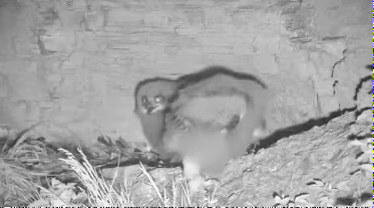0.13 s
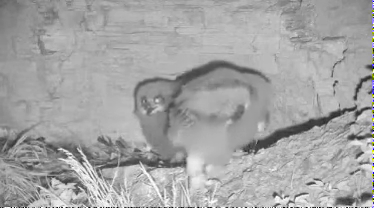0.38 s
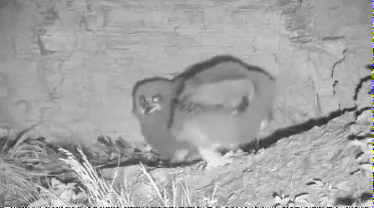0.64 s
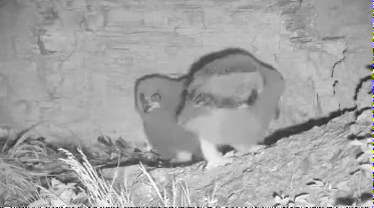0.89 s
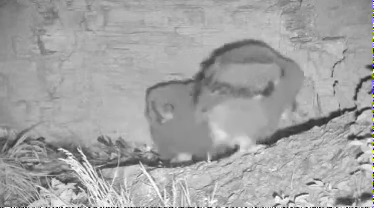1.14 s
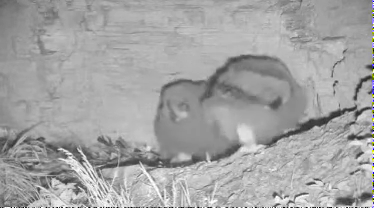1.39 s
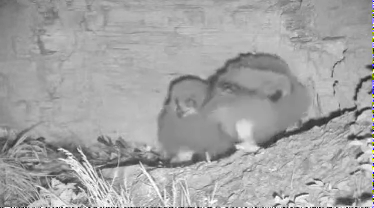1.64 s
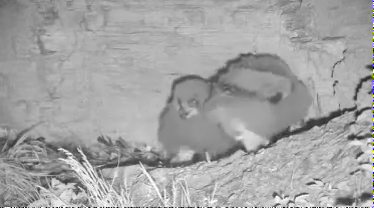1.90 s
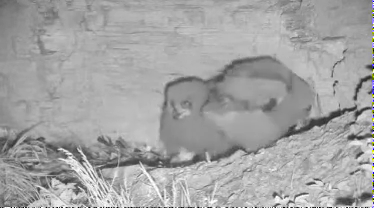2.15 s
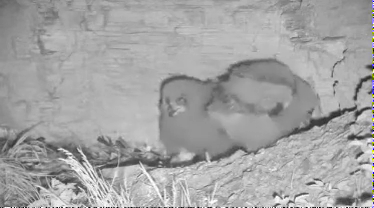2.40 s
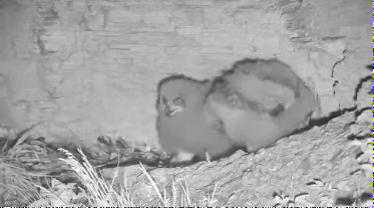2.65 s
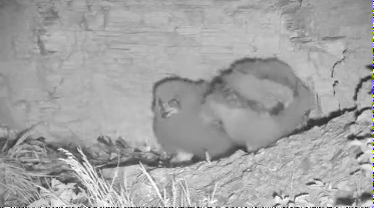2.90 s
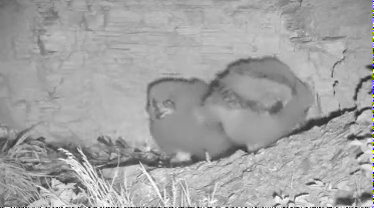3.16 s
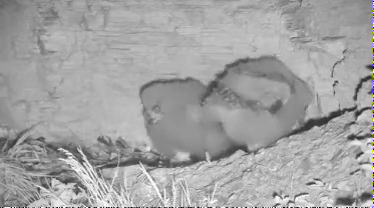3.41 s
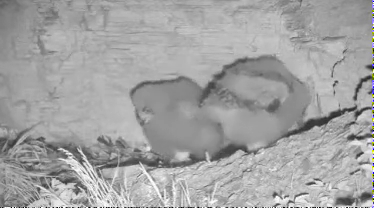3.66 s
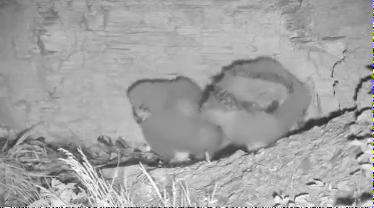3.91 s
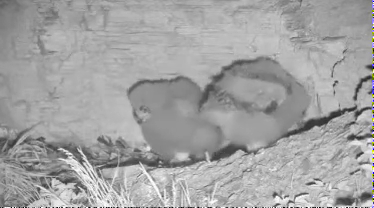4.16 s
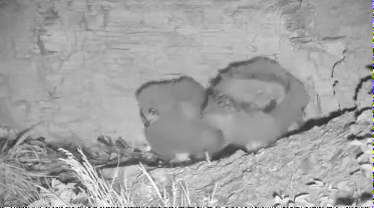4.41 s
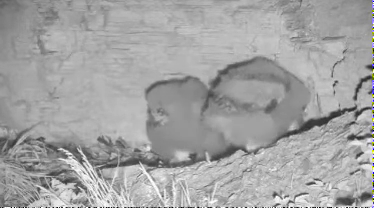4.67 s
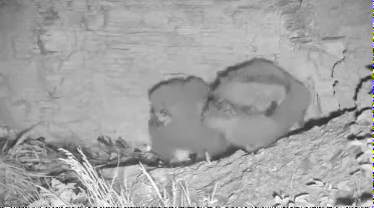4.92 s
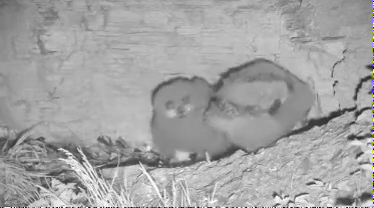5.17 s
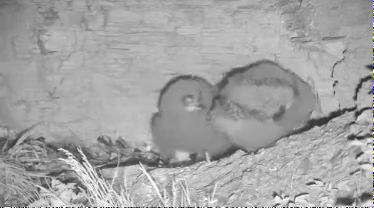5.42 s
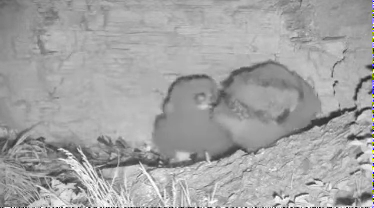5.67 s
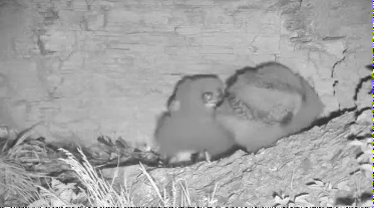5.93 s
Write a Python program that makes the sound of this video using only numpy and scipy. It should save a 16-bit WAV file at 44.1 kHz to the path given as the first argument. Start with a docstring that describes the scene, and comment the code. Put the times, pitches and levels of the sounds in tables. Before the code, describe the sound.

One small dry tick sounds, then an owl chick in a wooden nest begs twice, a couple of seconds apart. Each call starts as a hoarse, wavering, breathy whistle and runs on into a rush of hiss. The chick is close to the microphone, and the walls add only a faint tail. A faint fan whine, electrical buzz and soft hiss continue throughout.

```python
"""An owl chick begs twice, hoarsely, in a wooden nest, close to the microphone of a nest camera.
Each call is rushing air: a breathy whistle glides in the throat, then gives way to plain hiss
as the beak opens. The camera housing rings with the calls near 3 kHz; the walls add a faint tail.
One dry tick comes first. Behind it all a small fan whines and the mains buzzes faintly in soft hiss."""
import sys
import numpy as np
from scipy import signal
from scipy.fft import rfft, irfft
from scipy.io import wavfile
from scipy.ndimage import uniform_filter1d

SR = 44100
rng = np.random.default_rng(int(sys.argv[2]) if len(sys.argv) > 2 else 0)


def bounce(signal):
    """Save signal as a 16-bit WAV file at the path given by the first command-line argument."""
    frames = np.transpose(np.atleast_2d(signal))
    limited = np.clip(frames, -1, 1)
    pcm = np.round(limited * 32767).astype(np.int16)
    wavfile.write(sys.argv[1], SR, pcm)


N = 266651
TIME = np.arange(N) / SR

# first half of each call, levels ahead of the housing: start t/s, strongest t/s, end t/s, attack t/s,
# rasp, whistle, held note, strain and beak hiss (each level/dB), whistle width f/Hz
SQUEAL_BREATHS = [(0.867, 1.041, 1.216, .055, -27.5, -28, -24, -35, -51.5, 149.6),
                  (3.367, 3.568, 3.767, 0.0402, -28.5, -30, -35.5, -40, -35, 243)]
# second half, levels ahead of the housing: start t/s, strongest t/s, end t/s,
# rasp, held note, beak hiss and hollow note (each level/dB), held note f/Hz, hollow note f/Hz
RUSH_BREATHS = [(1.112, 1.313, 1.5118, -32.5, -30.5, -22, -38, 2973, 863),
                (3.703, 3.897, 4.07, -29, -39, -51, -47, 3071, 755.5)]
# pitch of the throat whistle, two arches for each squeal: t/s, f/Hz
WHISTLE_PITCH = [
    [(.87, 2600), (.905, 3250), (.955, 3530), (1.003, 3053), (1.042, 2720), (1.058, 3051), (1.083, 3692),
     (1.105, 3790), (1.2, 3300)],
    [(3.376, 2707), (3.408, 3485), (3.48, 3730), (3.522, 3200), (3.568, 2900), (3.6, 3841), (3.645, 3983),
     (3.73, 3710), (3.8, 3347)],
]
# spectrum of the loose rasp: f/Hz, level/dB
RASP_SPECTRUM = [(500, -31.5), (1300, -22), (1650, -14.5), (2080, -22), (2400, -11.5), (2700, -2),
                 (3350, 2), (3700, -12.5), (4300, -20.5), (4900, -26.5), (5400, -18), (6600, -28.5),
                 (12000, -34.5)]
# spectrum of the strained rasp: f/Hz, level/dB
STRAIN_SPECTRUM = [(3500, -24.5), (4650, -10), (5000, 4.5), (5450, 0.5), (5850, -2), (6300, -13),
                   (7000, -23.5), (7550, -18), (8200, -30.5), (14000, -38)]
# resonances of the open mouth: centre f/Hz, width f/Hz, level/dB
MOUTH_RESONANCES = [(759, 230, -15.5), (1760, 1000, -10.5), (2424, 96, -3.5), (2892, 460, -1),
                    (3723, 180, 4.5), (4107, 150, -2.5), (4681, 710, -5.5), (5665, 900, -15),
                    (7970, 770, -22)]
# breathy slides of the throat: start t/s, length t/s, start f/Hz, end f/Hz, level/dB
THROAT_SLIDES = [(0.828, 0.065, 1524, 2760, -60.5), (1.452, 0.0455, 3006, 2870, -37.5),
                 (1.491, 0.0292, 2084, 1661, -56), (3.359, 0.016, 3800, 4450, -61.5),
                 (3.73, 0.0264, 2472, 2212, -45.5), (4.065, 0.0197, 3620, 3330, -60.5)]
# response of the camera housing at the microphone: f/Hz, level/dB
HOUSING_RESPONSE = [(300, -15.5), (2000, -17.5), (2650, -5.5), (2850, -3.5), (3050, 1), (3250, -5.5),
                    (3500, -7), (4200, -6.5), (6000, -18), (15000, -30)]
# the dry tick: t/s, peak level/dB
TICK_EVENTS = [(0.2675, -21)]
# spectrum of the tick: f/Hz, level/dB
TICK_SPECTRUM = [(200, -48), (480, -8.5), (740, 1), (1150, 5), (1420, -5), (1700, 7.5), (2250, -8.5),
                 (3080, 7), (3550, 3), (4300, -11.5), (5100, -11), (5650, -26.5), (6250, -20),
                 (7100, -42.5), (8300, -23.5), (14000, -49.5)]
# tones of the fan: multiple of the shaft rate, level/dB
FAN_TONES = [(5, -64.5), (17, -76.5), (20, -56.5)]
# mains hum: f/Hz, level/dB
HUM_TONES = [(50, -75), (100, -87)]
# spectrum of the background hiss in the housing: f/Hz, level/dB
AIR_SPECTRUM = [(15, -34), (28, -15), (120, -19.5), (300, -14.5), (450, -15.5), (760, -14.5), (1300, -15.5),
                (1660, -9.5), (2000, -14), (2550, -15), (2870, -4), (3150, -8.5), (3450, -18.5),
                (5280, -23), (12000, -33), (15500, -37)]

THROAT_HZ = 3067.5  # the throat's own note
SQUEAL_SAG_DB, RUSH_SAG_DB = 9.5, 10.5  # how much weaker the ends are than the strongest moment
HISS_SAG_DB, STRAIN_SAG_DB = 18.5, 18.5  # hiss and strain need more force, so they fall further


def chick(flutter_db=0.0655, flutter_hz=130):
    """Close up, each squeal runs on into a rush; the air flutters slightly and the housing rings."""
    squeals = sum(squeal(row, pitch) for row, pitch in zip(SQUEAL_BREATHS, WHISTLE_PITCH))
    rushes = sum(rush(row) for row in RUSH_BREATHS)
    flutter = undb(flutter_db * walk(flutter_hz))
    return colour((squeals + rushes) * flutter, HOUSING_RESPONSE)


def squeal(row, pitch, catch_hz=2827, catch_width_hz=70, catch_db=-6):
    """A whistle arches twice over a rasp, a held note and an undertone; strain frays it in the middle."""
    start, strongest, end, attack_s, rasp_db, whistle_db, note_db, strain_db, hiss_db, width_hz = row
    gate, slack = blow(start, strongest, end, attack_s, roundness=1.335)
    hz = uniform_filter1d(np.interp(TIME, *np.transpose(pitch)), size=600)
    catch = (1 + np.tanh((catch_hz - hz) / catch_width_hz)) / 2  # at low pitch the voice catches
    under_hz = 2313.6 * (hz / THROAT_HZ) ** 0.24  # bends by a share of the whistle's glide
    undertone = whistle(under_hz, width_hz=87, jitter=.009, pure=.2)
    rasp = steady(colour(noise(), RASP_SPECTRUM)) + undb(-7) * undertone
    throat = (undb(rasp_db) * rasp
              + undb(whistle_db) * gliding_whistle(hz, slack, width_hz)
              + undb(note_db) * (1 - catch) * held_note(THROAT_HZ))
    strain = unit(colour(noise(), STRAIN_SPECTRUM))
    strain += undb(-2) * whistle(0.82 * hz, width_hz=190, jitter=0.02011, pure=0)  # below the whistle
    return gate * (undb(catch_db * catch - SQUEAL_SAG_DB * slack) * throat
                   + undb(strain_db - STRAIN_SAG_DB * slack) * strain
                   + undb(hiss_db - HISS_SAG_DB * slack) * open_mouth())


def rush(row, hollow_sag_db=30, hollow_rise_per_s=0.71):
    """The beak opens: hiss swells over rasp and held note, with a rising hollow note at its height."""
    start, strongest, end, rasp_db, note_db, hiss_db, hollow_db, note_hz, hollow_hz = row
    gate, slack = blow(start, strongest, end, attack_s=.05, roundness=1.48)
    rasp = steady(colour(noise(), RASP_SPECTRUM))
    throat = undb(rasp_db) * rasp + undb(note_db) * held_note(note_hz)
    rise = np.exp(hollow_rise_per_s * (np.clip(TIME, start, end) - strongest))
    hollow = whistle(hollow_hz * rise, width_hz=40, jitter=.018, pure=0.13)
    return gate * (undb(-RUSH_SAG_DB * slack) * throat
                   + undb(hiss_db - HISS_SAG_DB * slack) * steady(open_mouth())
                   + undb(hollow_db - hollow_sag_db * slack) * hollow)


def blow(start, strongest, end, attack_s, roundness, release_s=0.0359):
    """One push of air: its gate, and its slack, 0 at the strongest moment and 1 at both ends."""
    gate = np.clip((TIME - start) / attack_s, 0, 1) * np.clip((end - TIME) / release_s, 0, 1)
    slack = np.interp(TIME, [start, strongest, end], [1, 0, 1]) ** roundness
    return gate, slack


def gliding_whistle(hz, slack, width_hz, lock_width_hz=400, swell_db=10.5, clearing_db=14):
    """The gliding side of the syrinx: loud and clear as it glides near 3.07 kHz, breathy away from it."""
    lock = (1 - slack) / (1 + ((hz - THROAT_HZ) / lock_width_hz) ** 2)
    purity = .4 * undb(clearing_db * lock)
    tone = steady(whistle(hz, width_hz, jitter=0.013764, pure=purity), size=500)
    octave = whistle(2 * hz, width_hz=450, jitter=0.012, pure=0)
    return undb(swell_db * lock) * tone + undb(-21) * (1 - slack) * octave


def held_note(hz):
    """The level note of the other side of the syrinx."""
    return steady(whistle(np.full(N, hz), width_hz=99, jitter=0.01249, pure=1.89), size=600)


def whistle(hz, width_hz, jitter, pure):
    """A wavering air tone that turbulence smears into a narrow band; pure weights its clean core."""
    phase = 2 * np.pi * np.cumsum(hz * (1 + jitter * walk(72.4))) / SR
    return unit((pure + walk(width_hz)) * np.cos(phase) + walk(width_hz) * np.sin(phase))


def open_mouth(jet_db=-38):
    """Turbulent hiss in the resonances of the open mouth."""
    bands = sum(undb(db) * resonate(noise(), hz, width) for hz, width, db in MOUTH_RESONANCES)
    return unit(bands + undb(jet_db) * noise())


def slides():
    """Short breathy glides swell and fade as the throat opens and closes."""
    out = np.zeros(N)
    for start, length, start_hz, end_hz, db in THROAT_SLIDES:
        along = np.clip((TIME - start) / length, 0, 1)
        tone = whistle(start_hz + (end_hz - start_hz) * along, width_hz=140, jitter=0.02, pure=0.2)
        out += undb(db) * np.sin(np.pi * along) * tone
    return out


def nest(direct, t60=0.97, wet_db=-23):
    """The wooden walls send a faint diffuse tail to the microphone."""
    tail = noise() * np.exp(-np.log(1000) * TIME / t60)
    return direct + undb(wet_db) * signal.fftconvolve(direct, tail / np.linalg.norm(tail))[:N]


def ticks(echo_s=0.0029, echo_db=-8, scatter_db=-25, t60=0.0373):
    """A sharp tap, its bounce off the near wall and a brief scatter."""
    out = np.zeros(N)
    for start, db in TICK_EVENTS:
        age = np.maximum(TIME - start, 0)
        push = undb(scatter_db) * noise() * (age > 0) * np.exp(-np.log(1000) * age / t60)
        push[int(start * SR)] += 1
        push[int((start + echo_s) * SR)] += undb(echo_db)
        tap = colour(push, TICK_SPECTRUM)
        out += undb(db) * tap / np.abs(tap).max()
    return out


def fan(shaft_hz=144.4, drift=0.00048, waver_db=0.81, waver_hz=6.1, wobble_rad=.023):
    """A five-bladed fan whines; its shaft hurries and lags once a turn, which adds sidebands."""
    turn = 2 * np.pi * np.cumsum(shaft_hz * (1 + drift * walk(2.494))) / SR
    angle = turn + wobble_rad * np.sin(turn)
    whine = np.zeros(N)
    for order, db in FAN_TONES:
        gain = undb(db + waver_db * walk(waver_hz))
        whine += gain * np.sin(round(order) * angle + rng.uniform(0, 2 * np.pi))
    return np.sqrt(2) * whine


def mains(mains_hz=50, buzz_db=-77.0, db_per_octave=-14, weak_db=-7, scatter_cycles=0.076):
    """Low hum and a thin buzz: high odd harmonics, nearly in step so that they form spikes."""
    out = sum(undb(db) * np.sin(2 * np.pi * hz * TIME) for hz, db in HUM_TONES)
    orders = np.arange(67, 160, 2)
    for i, order in enumerate(orders):
        db = buzz_db + db_per_octave * np.log2(order / orders[0])
        db += weak_db * bool(i % 3)  # every third one stands out
        cycles = order * mains_hz * TIME + scatter_cycles * rng.standard_normal()
        out += undb(db) * np.sin(2 * np.pi * cycles)
    return np.sqrt(2) * out


def housing_air(level_db=-59.5):
    """Soft, even hiss in the housing, right at the microphone."""
    return undb(level_db) * unit(colour(noise(), AIR_SPECTRUM))


def undb(db):
    """Decibels to gain."""
    return 10 ** (np.asarray(db) / 20)


def unit(x):
    """Scale to rms 1."""
    return x / np.sqrt(np.mean(x ** 2))


def noise():
    """White noise."""
    return rng.standard_normal(N)


def walk(rate_hz):
    """Smooth random wandering with spread 1."""
    hz = np.arange(N // 2 + 1) * SR / N
    return unit(irfft(rfft(noise()) / (1 + (hz / rate_hz) ** 4), N))


def colour(x, points, size=4096):
    """Causal filter through the points of a response: f/Hz, level/dB."""
    hz, db = np.transpose(points)
    grid = np.maximum(np.arange(size // 2 + 1) * SR / size, 1)
    gain = undb(np.interp(np.log(grid), np.log(hz), db))
    cepstrum = irfft(np.log(gain))
    cepstrum[1:size // 2] *= 2  # fold onto positive time for minimum phase
    cepstrum[size // 2 + 1:] = 0
    impulse = irfft(np.exp(rfft(cepstrum)))
    return signal.fftconvolve(x, impulse)[:N]


def resonate(x, hz, width_hz):
    """Steep-sided resonance, gain 1 at the centre."""
    b, a = signal.iirpeak(hz, hz / width_hz, fs=SR)
    return signal.lfilter(b, a, signal.lfilter(b, a, x))


def steady(x, size=1100):
    """Hold the slow level at 1 and keep the quick flutter."""
    return x / np.sqrt(uniform_filter1d(x ** 2, size) + 1e-12)


def scene():
    """One microphone inside the nest: the chick close by and a tick, over the camera's steady sounds."""
    air = housing_air()
    calls = nest(chick() + slides())
    return (calls + ticks() + fan() + mains() + air)[None]


def record(dry, top_hz=15500):
    """The recorder cuts the top treble steeply."""
    return signal.sosfilt(signal.ellip(10, .1, 70, top_hz, fs=SR, output="sos"), dry)


dry = scene()
out = record(dry)
bounce(out)
```